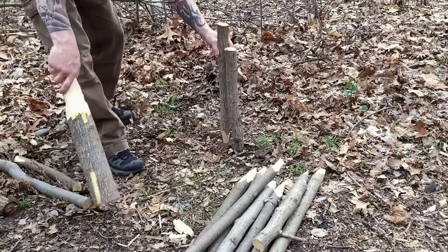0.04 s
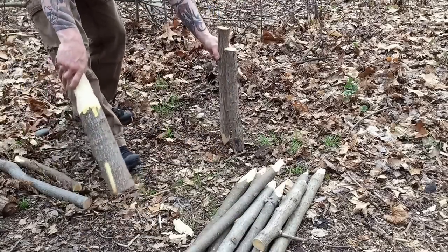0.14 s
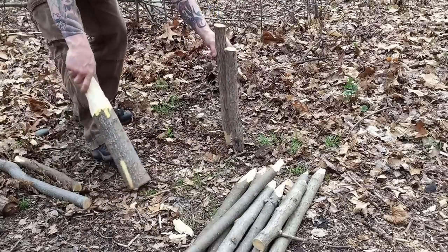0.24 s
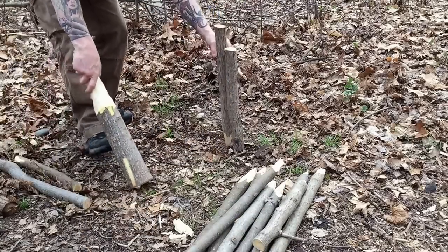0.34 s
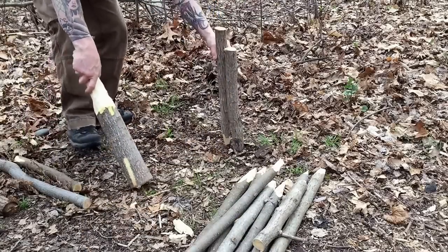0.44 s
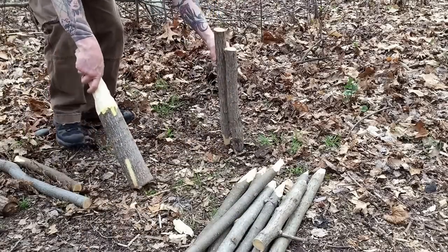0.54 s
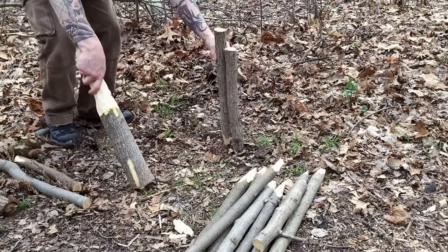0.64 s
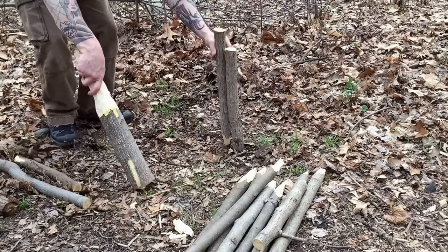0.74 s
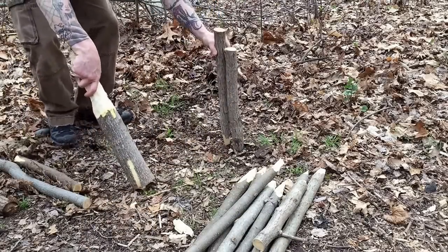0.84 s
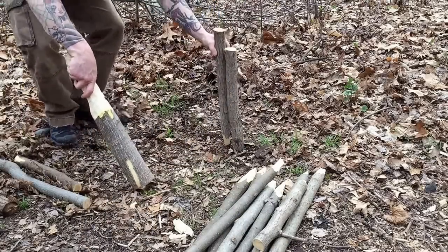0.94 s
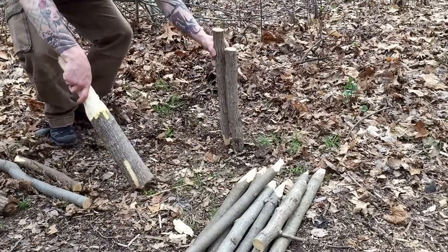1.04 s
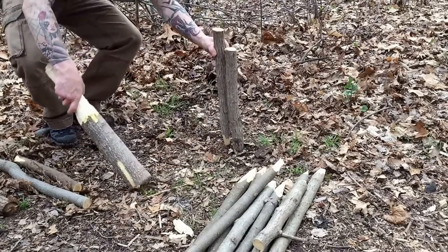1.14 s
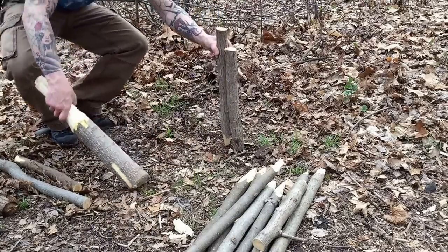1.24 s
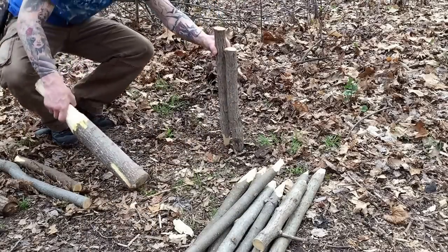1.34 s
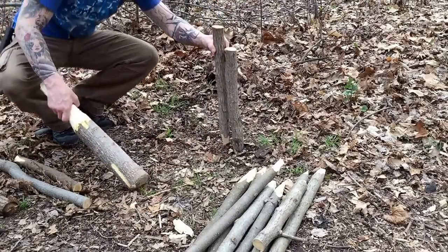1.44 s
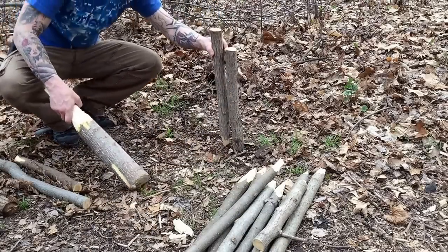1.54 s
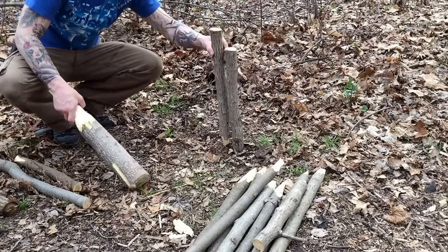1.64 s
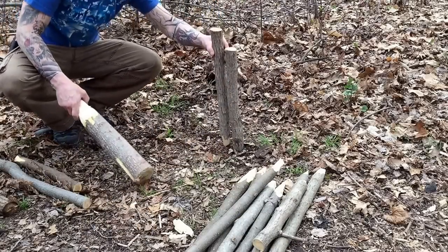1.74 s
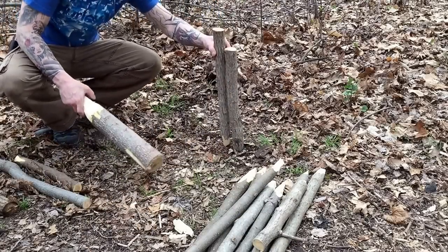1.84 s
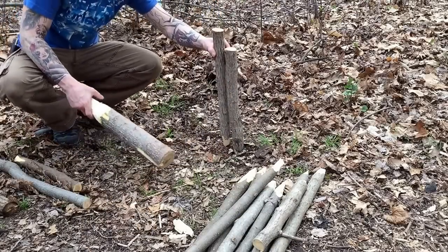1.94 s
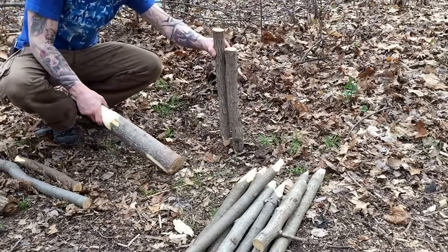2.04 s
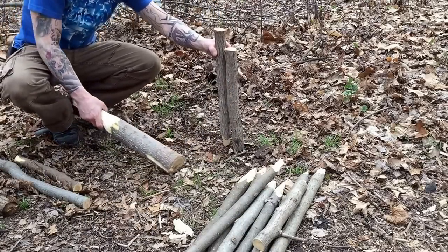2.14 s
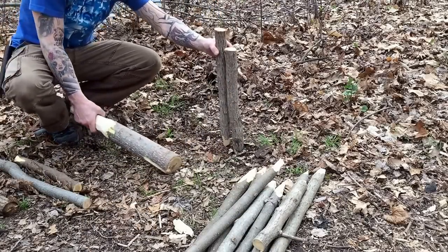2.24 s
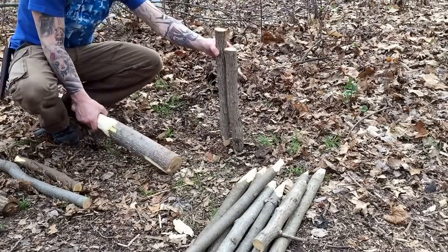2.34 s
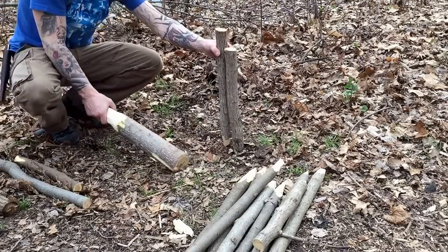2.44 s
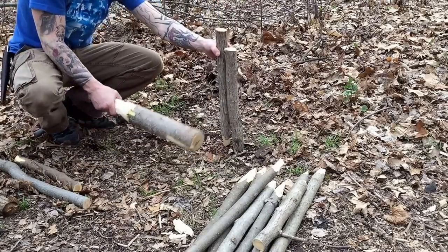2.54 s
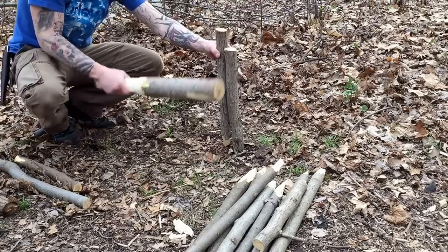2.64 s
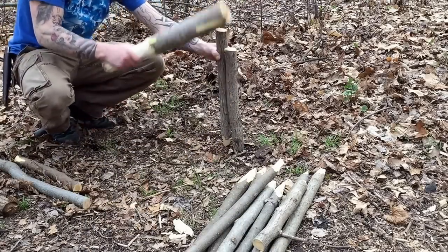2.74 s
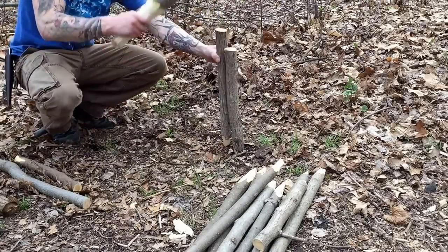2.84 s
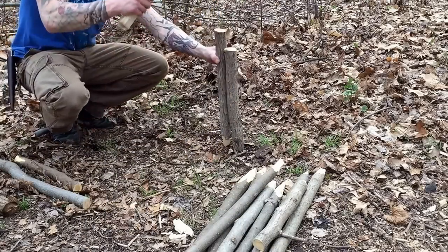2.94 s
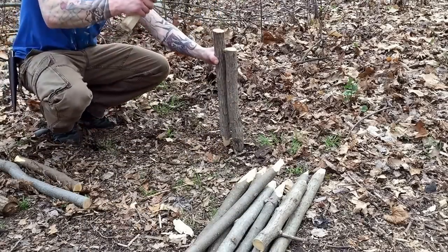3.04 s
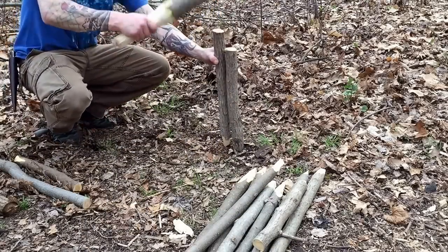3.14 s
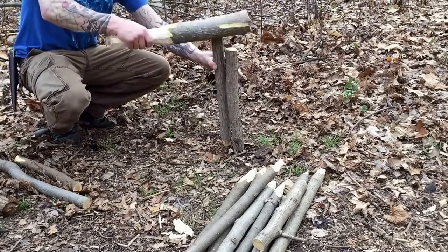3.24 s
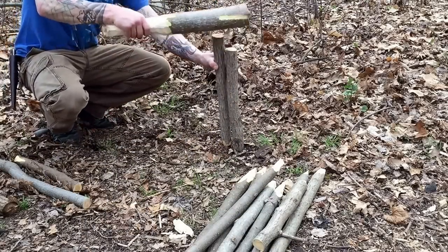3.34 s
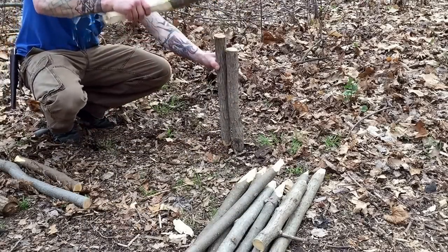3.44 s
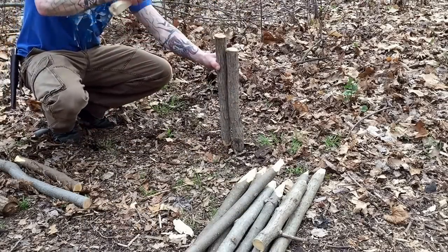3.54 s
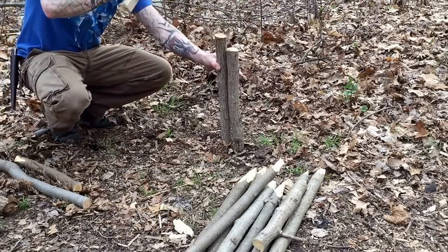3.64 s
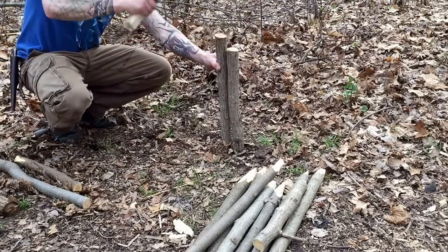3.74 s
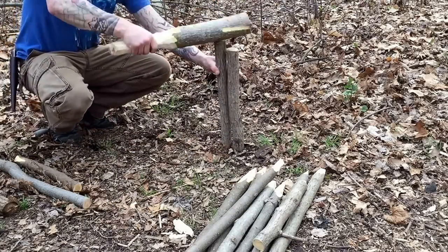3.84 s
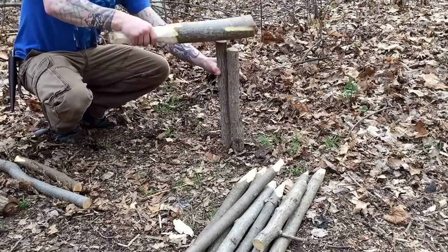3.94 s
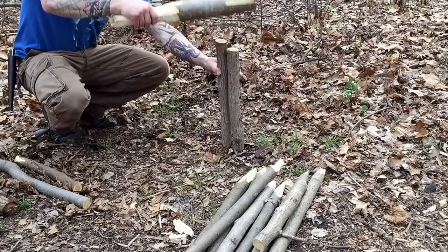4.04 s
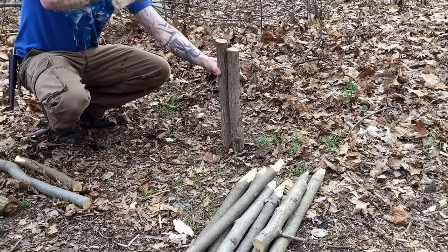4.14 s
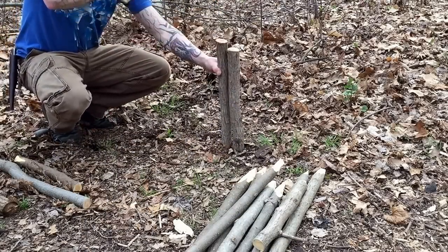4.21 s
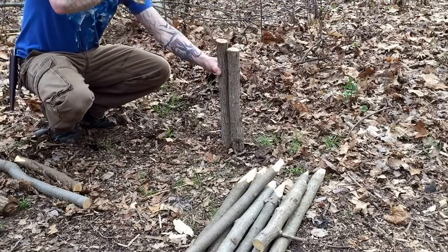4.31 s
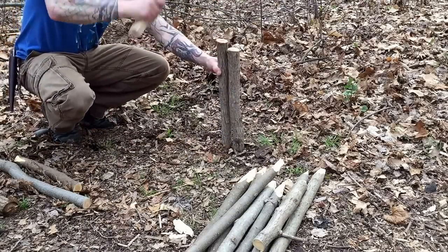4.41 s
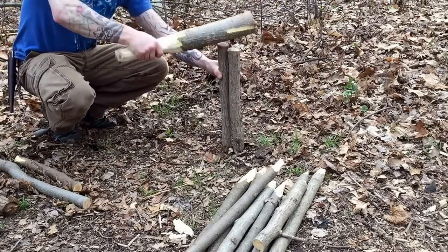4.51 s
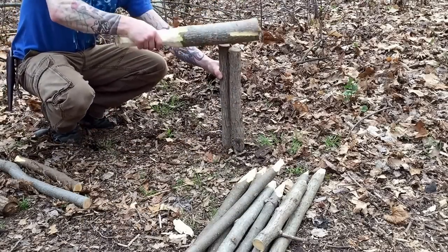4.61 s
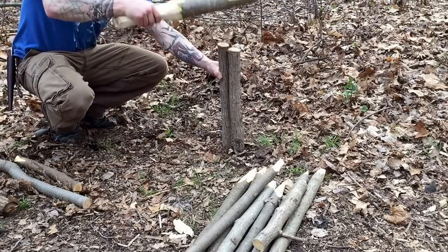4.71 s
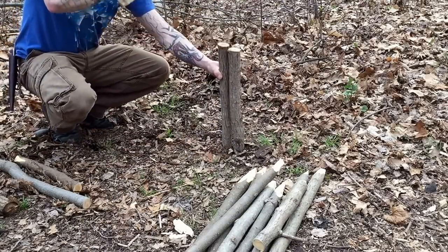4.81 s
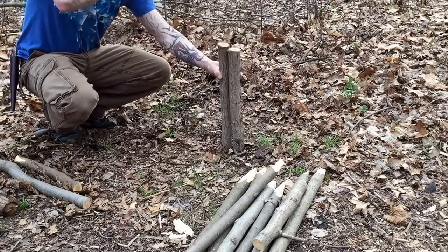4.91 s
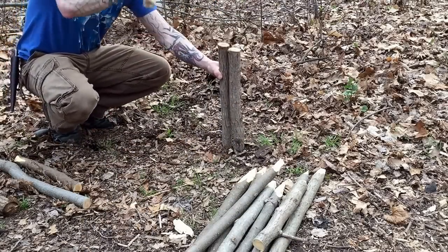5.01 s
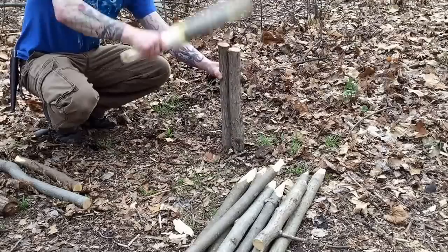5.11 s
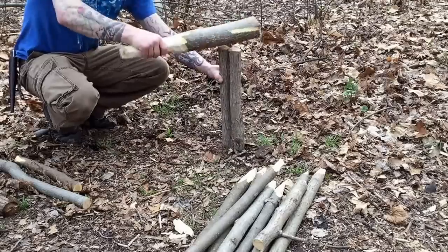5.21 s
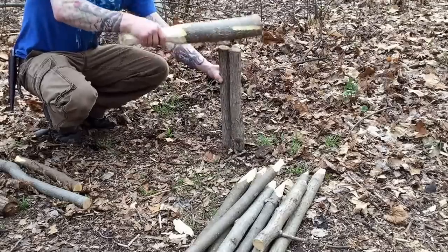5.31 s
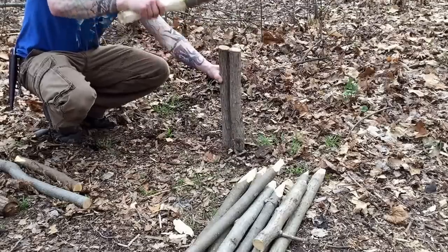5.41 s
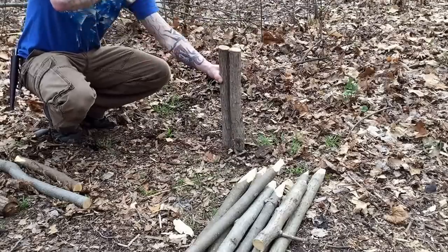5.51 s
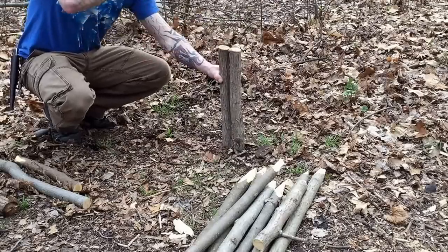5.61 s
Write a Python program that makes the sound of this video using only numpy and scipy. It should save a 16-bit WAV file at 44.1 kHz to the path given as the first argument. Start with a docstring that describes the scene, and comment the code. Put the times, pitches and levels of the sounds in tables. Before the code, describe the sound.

A mono outdoor take: first leaf litter crunching and ticking under feet, thin bird chirps and a distant lower call over soft rumble and air hiss. The rustling fades to near stillness, then four hard knocks of club on wooden stake follow at a steady pace, each a short crack with a dull thud, a little shaken litter and a weak scattered forest echo.

```python
"""In a wood a heavy wooden club knocks four times on a stake and drives it into the soil.
Before that, boots shift in dry leaves, while a songbird and a farther, lower caller sound among the trees.
Blows are forced damped modes, leaves are random grains filtered by resonance, and voices are gliding sines.
Distant traffic rumble and a faint hiss of air are filtered noise; trunks return lumpy, dying echoes."""
import sys
import numpy as np
from scipy import signal
from scipy.fft import rfft, irfft, next_fast_len
from scipy.io import wavfile

SR = 44100
rng = np.random.default_rng(int(sys.argv[2]) if len(sys.argv) > 2 else 0)


def unload_audio(sound):
    """Save the sound as a 16-bit wav file, at the path given as the first command line argument."""
    columns = np.transpose(np.atleast_2d(sound))
    # keep every value between -1 and 1, then stretch to whole-number steps
    steps = np.round(np.clip(columns, -1, 1) * 32767)
    wavfile.write(sys.argv[1], SR, steps.astype(np.int16))


N = 250047
TIME = np.arange(N) / SR   # s
CUTOFF_HZ = 16900   # stopband edge of the final low-pass

# Course of the background: time_s, rumble_db, air_db [dB, each in its own reference band]
BACKGROUND_LEVELS = [(0.0, -47, -64.5), (1.0, -46, -66), (2.4, -46.5, -66.5), (3.1, -49.5, -67),
                     (3.45, -44.5, -66.5), (3.9, -49, -64), (4.26, -53, -69.5), (4.6, -46, -66),
                     (5.0, -49.5, -68.5), (5.67, -52, -67)]
# Spectrum of the traffic rumble: frequency_hz, level_db [relative dB per Hz]
RUMBLE_SPECTRUM = [(15, -94.5), (25, -47.5), (27, -33.5), (30, -27), (39, -10.5), (59, 2), (78, -6.5),
                   (91, 5), (107, -2), (124, -9.5), (184, -21.5), (253, -33.5), (320, -42.5), (420, -80.5),
                   (700, -120)]
# Spectrum of the air hiss: frequency_hz, level_db [relative dB per Hz]
AIR_SPECTRUM = [(120, -46), (200, -10.5), (268, -9.5), (329, -12.5), (417, -14), (492, -15.5), (661, -11.5),
                (1110, -10), (1280, -14.5), (2180, -18.5), (2980, -23), (12300, -34), (16200, -35.5)]

# Far hoarse call that rises, arches and sags, as a list of notes:
# time_s [s after the start, at pace 1], pitch_hz [strongest partial, at factor 1], level_db [relative dB]
FAR_CALL_NOTES = [
    [(0, 1120, -3), (.04, 1530, 0), (.08, 1410, 0.5), (.11, 1300, 1.5), (.145, 1140, -28)],
]
# Occurrences of the far call: start_s, pace [time factor], pitch [frequency factor], level_db
FAR_CALL_TIMES = [(.25, 1.22, 1.02, -59.5), (1.576, 1.04, 1.034, -56.5), (1.73, 1.24, 1.08, -63.5),
                  (2.19, 0.8, 1.004, -53.5), (2.533, 1.1, 1.0, -57), (2.93, 0.99, 1.004, -56.5),
                  (3.33, 1.02, 0.98, -54)]
# Partials of the far caller: multiple [of the written pitch], level_db [relative dB]
FAR_CALL_PARTIALS = [(1 / 2, -22), (1, 0), (3 / 2, -15)]

# Songbird's two phrases and a short chip, each a list of notes:
# time_s [s after the start, at pace 1], pitch_hz [nominal Hz, at factor 1], level_db [relative dB]
FALLING_NOTES = [
    [(0, 3480, -8), (.02, 3380, -1), (.05, 3250, -1), (.057, 3200, -12)],
    [(.058, 2603, 2), (.074, 3086, 3), (.089, 2523, 1), (.107, 2300, -11.5)],
    [(.207, 2800, -9), (.222, 2720, -7), (.24, 2620, -14)],
]
ARCHING_NOTES = [
    [(0, 2545, -4), (.014, 2527, -1), (.029, 2440, -5), (.049, 2725, 0), (.068, 2915, -3),
     (.081, 2450, 0.5), (.105, 2314, -9)],
]
CHIP_NOTES = [
    [(0, 1750, -3), (.015, 1920, -8), (.032, 1900, -19)],
]
# When each is sung: start_s, pace [time factor], pitch [frequency factor], level_db
FALLING_TIMES = [(1.43, 1.0, .995, -55.5), (3.111, 0.98, 0.99, -57)]
ARCHING_TIMES = [(2.036, .98, 1.0, -50.5), (2.575, 1.02, 1, -51)]
CHIP_TIMES = [(.25, 1.1, 1, -52), (1.068, 0.75, 1.35, -51), (1.575, 1.05, .99, -46),
              (1.635, 1.04, .99, -52)]

# Boots pressing into the leaves: start_s, hold_s, crackle_db, scuff_db [dB, each in its own reference band]
BOOT_TREADS = [(0.0, 0.045, -48, -57.5), (0.127, 0.025, -56, -71), (0.287, .02, -62.5, -80),
               (0.312, 0.013, -55.5, -66), (0.425, 0.017, -65, -89), (0.658, 0.054, -42, -54),
               (0.744, 0.015, -49.5, -66), (0.853, 0.06, -60, -73.5), (0.899, 0.017, -60, -66),
               (0.924, 0.037, -54, -63), (0.983, 0.016, -52.5, -58.5), (1.255, 0.043, -49.5, -68.5),
               (1.431, .04, -61.5, -78), (1.494, 0.026, -50.5, -66), (2.103, 0.0068, -58.5, -79),
               (2.207, 0.06, -61, -74.5), (2.283, 0.088, -59.5, -68.5), (2.398, 0.054, -60.5, -74.5),
               (2.494, 0.028, -69, -75), (2.585, 0.043, -73.5, -77), (2.684, .02, -62, -74),
               (2.835, 0.064, -71, -82), (2.939, 0.078, -70.5, -79.5)]
PRESS_DB_PER_S, EASE_DB_PER_S = 997, 370   # a tread swells fast and eases more slowly
SETTLE_DB, SETTLE_DB_PER_S = -19.0, 34   # then the bent leaves go on settling faintly
# Filter curve of the leaf crackle: frequency_hz, gain_db [relative dB]
CRACKLE_FILTER = [(1470, -11.5), (2500, -7.5), (4880, -28), (5560, -4), (7830, -4.5), (8870, 0.5),
                  (10400, -6.5), (13500, 2), (16000, -5)]
# Filter curve of the duller scuff: frequency_hz, gain_db [relative dB]
SCUFF_FILTER = [(180, -33), (300, -4.5), (495, -3), (590, -1.5), (1270, -4), (1550, -2), (6000, -4),
                (7800, -23), (13200, -120)]
# Snapping leaves and twigs: start_s, peak_db, centre_hz
LEAF_SNAPS = [(0.7016, -28, 9100), (0.7334, -37, 9100), (0.767, -25, 13600), (1.1054, -48, 8520),
              (1.146, -39.5, 8700), (1.2333, -35, 12900), (1.2515, -32.5, 6300), (1.2687, -27.5, 6580),
              (1.286, -42, 9000), (1.306, -42, 7960), (1.322, -35, 8000), (1.3468, -43, 5630),
              (1.4666, -42, 7180), (1.4946, -22, 9000), (1.6, -43, 15200), (1.969, -46, 13000),
              (2.107, -37.5, 9500), (2.1673, -41, 13200), (2.211, -35, 13700), (2.2918, -34, 12500),
              (2.3216, -45, 6380), (2.4502, -30, 14100), (3.0016, -44.5, 8640), (3.2658, -27, 6120),
              (3.983, -45, 8600)]
# Club end on a root: start_s, strength_db [relative dB], pitch_hz
ROOT_TAPS = [(0.055, -16, 1114)]

# Raised club stirring the air: start_s, length_s, level_db [before the swell], centre_hz
CLUB_SWISHES = [(3.55, 0.12, -52.5, 137), (4.199, 0.11, -58, 150), (4.791, 0.18, -57.5, 217),
                (5.452, 0.17, -65, 193)]
# Blows: start_s, splinter_db, litter_db [before its decay], echo_db [relative to the blow]
CLUB_BLOWS = [(3.254, -15.5, -46, -28), (3.896, -15.5, -46, -25), (4.542, -15.5, -42.5, -29),
              (5.191, -11, -40.5, -28)]
# Modes of soil, stake and club; each blow lands elsewhere and wakes them differently:
# pitch_hz, longest_t60_s, blow_1_db, blow_2_db, blow_3_db, blow_4_db [relative dB]
BLOW_MODES = [ (68.6, 0.16, -57.5, -21.5, -20.5, -13), (96.4, 0.053, -20.5, -17, -23.5, -19.5),
              (109, 0.035, -27, -19, -14.5, -17.5), (166.4, 0.084, -21.5, -20, -20.5, -9.5),
              (238, 0.041, -17.5, -21, -14, -15.5), (331, 0.048, -28, -18.5, -23.5, -17.5),
              (407.3, 0.026, -13.5, -12.5, -15, -8), (466, 0.023, -24.5, -10, -6.5, -8.5),
              (557, 0.048, -33, -29.5, -20, -18.5), (702, 0.048, -27, -19.5, -11, -12),
              (749, 0.05, -27, -14.5, -23.5, -18.5), (847, 0.035, -25, -25, -20.5, -24.5),
              (1102, 0.033, -31.5, -21, -24.5, -34), (1363, 0.049, -28.5, -19, -16.5, -14.5),
              (1432, 0.019, -59, -62.5, -36, -15.5), (1757, 0.017, -58, -17, -17, -24),
              (2270, 0.053, -15, -31.5, -39.5, -33), (2450, 0.023, -27, -26.5, -24, -25),
              (3630, 0.042, -29, -23.5, -18.5, -16), (3640, 0.0079, -12.5, -10, -12.5, -10),
              (5830, 0.013, -12, -20, -46.5, -30.5), (6555, 0.019, -33, -18.5, -26.5, -13),
              (9870, 0.0097, -12.5, -40, -43.5, -30), (13200, 0.0087, -47, -33, -32, -35.5), ]
# Spectrum of the leaf litter shaken by a blow: frequency_hz, level_db [relative dB per Hz]
LITTER_SPECTRUM = [(300, -30.5), (1000, 2), (3000, -4.5), (7000, -11.5), (16000, -15)]


def from_db(db):
    """Logarithmic level: decibels to amplitude gain."""
    return 10 ** (np.asarray(db) / 20)


def rms_one(x):
    """Normalisation of power: scale to rms 1."""
    return x / np.sqrt(np.mean(x ** 2) + 1e-20)


def in_time(rows):
    """Linear interpolation: the columns of a time table at every sample."""
    time_s, *columns = np.transpose(rows)
    return [np.interp(TIME, time_s, column) for column in columns]


def band_pass(x, low_hz, high_hz, order):
    """Band limitation by a Butterworth filter."""
    return signal.sosfilt(signal.butter(order, [low_hz, high_hz], "band", fs=SR, output="sos"), x)


def high_pass(x, cutoff_hz, order):
    """Removal of the bass by a Butterworth filter."""
    return signal.sosfilt(signal.butter(order, cutoff_hz, "high", fs=SR, output="sos"), x)


def coloured(x, spectrum):
    """Spectral shaping: filter by a curve interpolated over log frequency, then scale to rms 1."""
    hz, level_db = np.transpose(spectrum)
    size = next_fast_len(len(x))
    grid = np.log(np.arange(size // 2 + 1) * SR / size + 1)   # the added 1 Hz avoids log 0
    gain = from_db(np.interp(grid, np.log(hz), level_db, left=-90, right=-90))
    return rms_one(irfft(rfft(x, size) * gain, size)[:len(x)])


def band_level(x, low_hz, high_hz):
    """Band level: scale the whole sound so that one reference band has rms 1."""
    band = band_pass(x, low_hz, high_hz, order=4)
    return x / np.sqrt(np.mean(band ** 2))


def drift(rate_hz):
    """Slow random fluctuation: white noise through two equal low-pass poles, scaled to rms 1."""
    r = np.exp(-2 * np.pi * rate_hz / SR)
    noise = rng.standard_normal(N + SR)
    smooth = signal.lfilter([1], [1, -2 * r, r * r], noise)
    return rms_one(smooth[SR:])   # the first second lets the filter settle


def grains(count, per_s, spread_db):
    """Shot noise: clicks of random time, sign and uneven size, scaled to rms 1."""
    size_db = spread_db * np.minimum(rng.exponential(1, count), 6)
    sizes = from_db(size_db) * rng.choice([-1, 1], count)
    return rms_one(sizes * (rng.random(count) < per_s / SR))


def ring(force, modes):
    """Modal resonance: a force sets (pitch_hz, level_db, t60_s) modes into decaying vibration."""
    out = np.zeros(len(force))
    for hz, level_db, t60 in modes:
        r, w = from_db(-60 / (t60 * SR)), 2 * np.pi * hz / SR
        mode = signal.lfilter([0, np.sin(w)], [1, -2 * r * np.cos(w), r * r], force + 1e-18)
        out += from_db(level_db) * mode
    return out


def push(t, start_s, length_s):
    """Contact force: a half-sine pulse whose samples sum to one."""
    shape = np.sin(np.pi * np.clip((t - start_s) / length_s, 0, 1))
    return shape / shape.sum()


def add(out, sound, start_s):
    """Superposition: mix a sound in at its start time."""
    i = round(start_s * SR)
    out[i:i + len(sound)] += sound[:N - i]


def scattered(x, t60):
    """Multiple scattering: trunks return lumpy echoes, modelled by decaying grains of unit energy."""
    t = TIME[:SR]
    tail = grains(SR, 5000, 5.1) * from_db(-60 * t / t60) * np.minimum(t / 0.0099, 1)
    return signal.fftconvolve(x, tail / np.sqrt(np.sum(tail ** 2)))[:N]


def background():
    """Broadband noise: far traffic rumble and the gently fluctuating hiss of moving air."""
    rumble_db, air_db = in_time(BACKGROUND_LEVELS)
    rumble = band_level(coloured(rng.standard_normal(N), RUMBLE_SPECTRUM), 40, 130)
    air = band_level(coloured(rng.standard_normal(N), AIR_SPECTRUM), 370, 2000)
    return from_db(rumble_db) * rumble + from_db(air_db + 1.2 * drift(14)) * air


def sung(phrase, times):
    """Scaling of time and pitch: the notes of a phrase, once for every time it is sung."""
    return [[(start + pace * s, pitch * hz, level_db + db) for s, hz, db in note]
            for start, pace, pitch, level_db in times for note in phrase]


def whistles(notes, partials, hoarse, wobble_hz):
    """Frequency modulation: gliding partials from a throat that wobbles in pitch and level."""
    out, wobble, flutter = np.zeros(N), drift(wobble_hz), drift(wobble_hz)
    for note in notes:
        s, hz, level_db = np.transpose(note)
        i = slice(round(s[0] * SR), round(s[-1] * SR))
        t = TIME[i]
        pitch = np.interp(t, s, hz) * (1 + hoarse * wobble[i])
        phase = 2 * np.pi * np.cumsum(pitch) / SR
        level = from_db(np.interp(t, s, level_db) + 60 * hoarse * flutter[i])
        fade = np.clip(np.minimum(t - s[0], s[-1] - t) / 0.0035, 0, 1)
        tone = sum(from_db(db) * np.sin(multiple * phase) for multiple, db in partials)
        out[i] += fade * level * tone
    return out


def far_caller():
    """Distance and scattering: a hoarse call of three partials with nearly as much echo as direct sound."""
    notes = sung(FAR_CALL_NOTES, FAR_CALL_TIMES)
    call = whistles(notes, FAR_CALL_PARTIALS, hoarse=0.025, wobble_hz=38.0)
    return call + from_db(-1.0) * scattered(call, t60=0.7)


def songbird():
    """Pure-tone whistling: one gliding partial, followed by a weaker, shorter woodland echo."""
    notes = sung(FALLING_NOTES, FALLING_TIMES) + sung(ARCHING_NOTES, ARCHING_TIMES)
    notes += sung(CHIP_NOTES, CHIP_TIMES)
    song = whistles(notes, [(0.99, 0)], hoarse=0.0025, wobble_hz=28)   # 0.99 of the nominal pitch
    return song + from_db(-5.0) * scattered(song, t60=0.34)


def treads():
    """Addition of powers: gains of crackle and scuff as each tread swells, holds, eases and settles."""
    power = np.zeros((2, N))
    for s, hold, *level_db in BOOT_TREADS:
        before, after = np.maximum(s - TIME, 0), np.maximum(TIME - s - hold, 0)
        easing = from_db(-EASE_DB_PER_S * after)
        settling = from_db(SETTLE_DB - SETTLE_DB_PER_S * after)
        shape = from_db(-PRESS_DB_PER_S * before) * (easing + settling)
        power += (from_db(level_db)[:, None] * shape) ** 2
    return np.sqrt(power)


def leaves():
    """Granular friction: clumped clicks ring leaves, each at its own pitch; the sole scuffs below them."""
    ticks = grains(N, 2500 * from_db(5 * drift(40)), 3.2)
    leaf_of_tick = rng.integers(0, 16, N)
    pitched = np.zeros(N)
    for leaf, hz in enumerate(np.geomspace(3000, 15500, 16)):
        own_ticks = ticks * (leaf_of_tick == leaf)
        pitched += ring(own_ticks, [(hz, 0, 16.0 / hz)]) * np.sqrt(hz)   # evens out the leaves' power
    crackle = rms_one(pitched) + .4 * ticks + .6 * rng.standard_normal(N)
    scuff = grains(N, 2500 * from_db(2.9 * drift(24)), 3.4) + 0.83 * rng.standard_normal(N)
    crackle_gain, scuff_gain = treads()
    crackle = band_level(coloured(crackle, CRACKLE_FILTER), 4000, 17600)
    scuff = band_level(coloured(scuff, SCUFF_FILTER), 3200, 4330)
    return crackle_gain * crackle + scuff_gain * scuff


def snaps():
    """Brittle fracture: each snap is a short noise burst filtered around its own pitch."""
    out, t = np.zeros(N), TIME[:SR // 20]
    for s, peak_db, hz in LEAF_SNAPS:
        burst = rng.standard_normal(len(t)) * np.exp(-t / 0.00023)
        click = band_pass(burst, 0.81 * hz, min(1.4 * hz, .45 * SR), order=2)
        add(out, from_db(peak_db) * click / np.abs(click).max(), s)
    return out


def root_tap():
    """Coupled resonance: a brief contact force passes through two equal damped modes in turn."""
    out, t = np.zeros(N), TIME[:SR // 20]
    for s, strength_db, hz in ROOT_TAPS:
        first = ring(push(t, 0, 0.00026), [(hz, 0, .006)])
        add(out, from_db(strength_db) * ring(first, [(hz, -26, .006)]), s)
    return out


def swish():
    """Air turbulence: the raised club makes soft low puffs of resonantly filtered noise."""
    out, t = np.zeros(N), TIME[:SR // 2]
    for s, length, level_db, hz in CLUB_SWISHES:
        noise = rms_one(ring(rng.standard_normal(len(t)), [(hz, 0, 10.6 / hz)]))
        swell = np.sin(np.pi * np.clip(t / length, 0, 1))
        add(out, from_db(level_db) * noise * swell, s)
    return out


def struck_modes(t, splinters, blow):
    """Impact excitation: large modes get a later, softer push, the soil the latest."""
    out = np.zeros(len(t))
    for hz, longest_t60, *level_db in BLOW_MODES:
        period = 1 / hz
        t60 = min(longest_t60, 55 * period)   # green wood damps within some tens of cycles
        start = 0.00025 + 0.002736 / (1 + (hz / 1800) ** 3) + 0.35 * max(period - .004, 0)
        force = push(t, start, 0.18 * period + 3 / SR)
        if hz > 2000:   # the small modes are rattled by the splintering
            force = 0.65 * force + 0.053 * splinters * np.exp(-t / 0.0062)
        out += ring(force, [(hz, level_db[blow], t60)])
    return out


def shaken_litter(t):
    """Granular decay: leaf grains jolt, then settle in ragged clumps."""
    litter = coloured(grains(len(t), 5000, 2.5), LITTER_SPECTRUM) * np.minimum(t / 0.0028, 1)
    litter *= from_db(-60 * t / 0.1) + from_db(-7.5 - 60 * t / 0.27)   # jolt + settling
    return litter * from_db(2.5 * drift(60)[:len(t)])


def blows():
    """Impact and modal decay: bark splinters, stake and soil ring, litter shakes and trunks echo."""
    direct, echo, t = np.zeros(N), np.zeros(N), TIME[:SR // 2]
    for blow, (s, splinter_db, litter_db, echo_db) in enumerate(CLUB_BLOWS):
        noise = rms_one(rng.standard_normal(len(t)))
        splinters = noise * np.minimum(t / 0.0006, 1) * np.exp(-t / 0.0035)
        hit = from_db(splinter_db) * signal.lfilter([.5], [1, -.35], splinters)
        hit += struck_modes(t, splinters, blow)
        hit = high_pass(hit, 75, order=2)   # the blows carry little deep bass
        add(direct, hit + from_db(litter_db) * shaken_litter(t), s)
        add(echo, from_db(echo_db) * hit, s)
    echo = band_pass(echo, 600, 2300, order=2)   # thin trunks, soft bark
    return direct + scattered(echo, t60=0.61)


def scene():
    """Superposition: everything as one microphone hears it."""
    surroundings = background() + far_caller() + songbird()
    ground = leaves() + snaps() + root_tap()
    return (surroundings + ground + swish() + blows())[None]


def record(dry):
    """Band limitation: the microphone drops the deepest bass, and the top is cut."""
    x = high_pass(dry, 48, order=4)
    return signal.sosfilt(signal.cheby2(14, 70, CUTOFF_HZ, fs=SR, output="sos"), x)


dry = scene()
out = record(dry)
unload_audio(out)
```